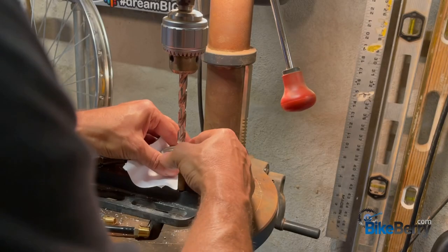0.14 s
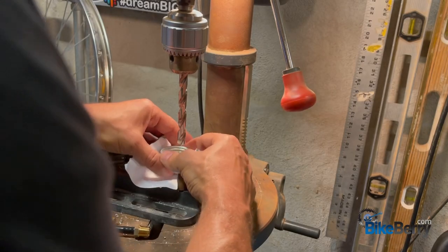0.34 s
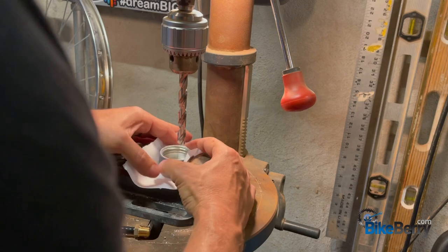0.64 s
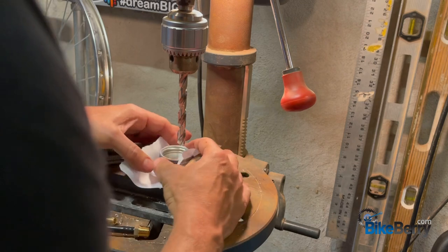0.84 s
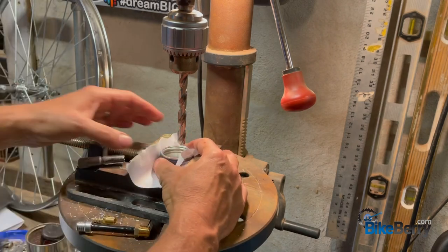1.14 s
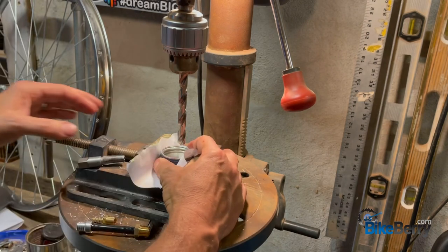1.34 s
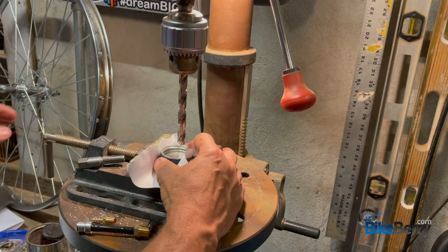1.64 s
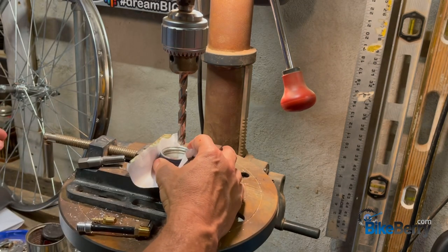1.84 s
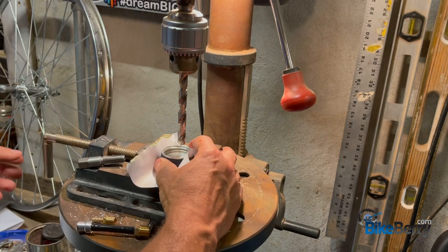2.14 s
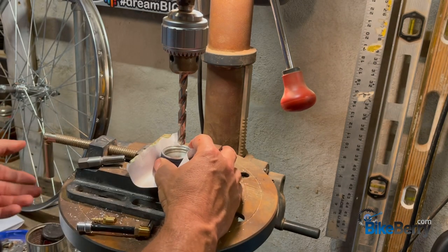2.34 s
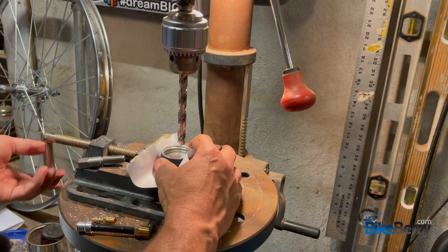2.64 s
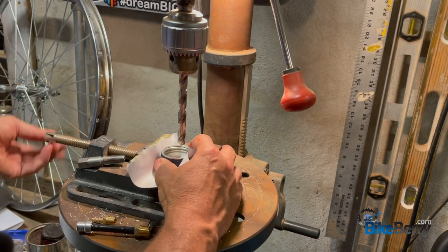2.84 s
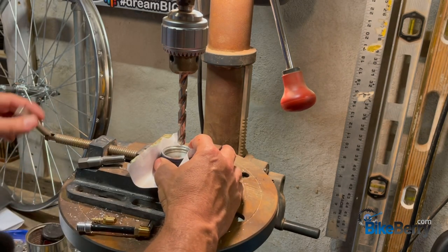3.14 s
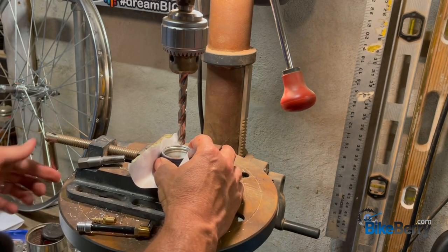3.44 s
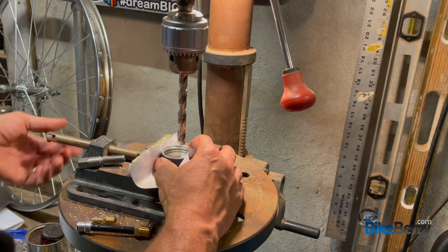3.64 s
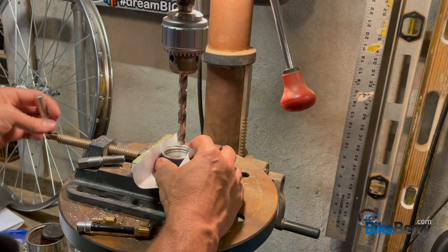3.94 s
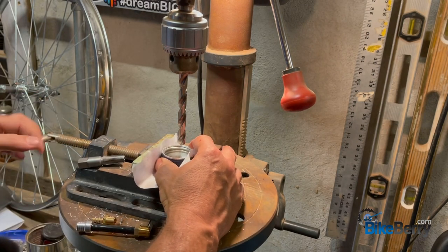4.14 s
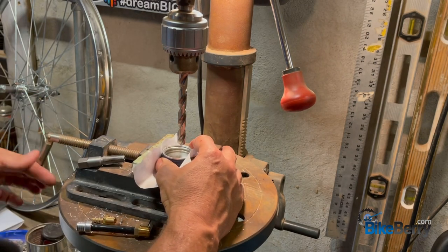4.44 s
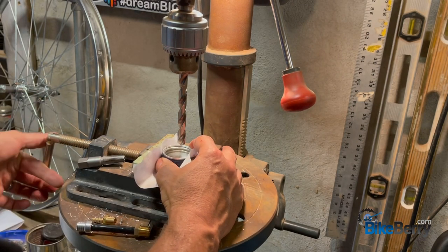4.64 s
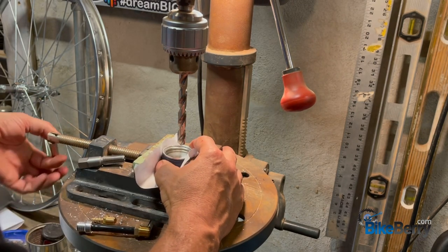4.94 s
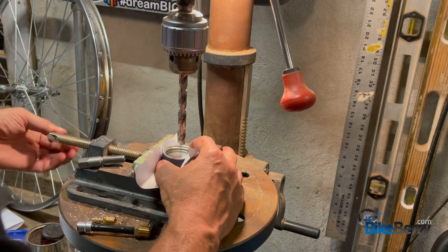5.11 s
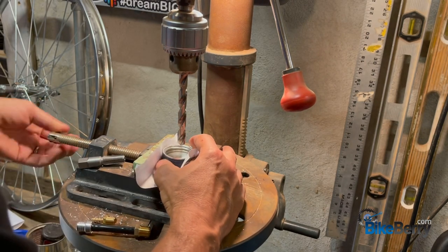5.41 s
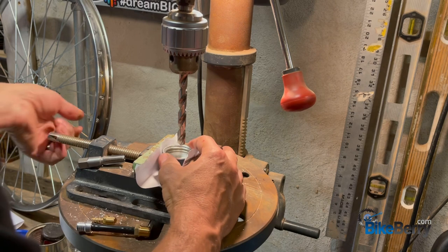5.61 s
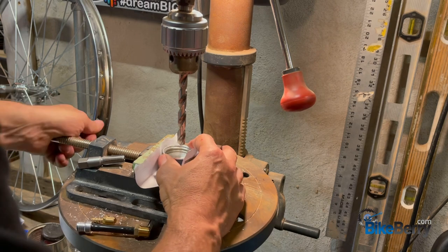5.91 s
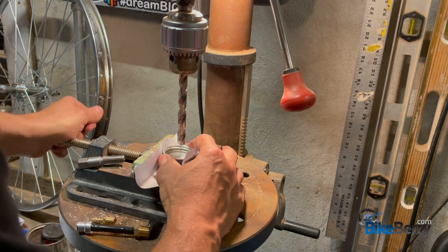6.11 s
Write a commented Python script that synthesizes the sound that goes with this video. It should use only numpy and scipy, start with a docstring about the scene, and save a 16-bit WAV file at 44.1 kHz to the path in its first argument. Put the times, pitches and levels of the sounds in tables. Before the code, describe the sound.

In a small, quiet workshop, heard up close, paper crinkles as a wrapped metal ring skids into a steel vise. Two sharp, briefly ringing clacks follow, then lighter clicks and scrapes. The vise screw is wound in with a soft rumble, dry grating, little squeaks and ticks from its sliding handle. The handle scrapes and knocks home, and a sleeve brushes past. Very faint cricket-like chirping lies behind.

```python
"""A small, quiet workshop, at an idle drill press. A paper-wrapped metal ring is settled in the vise:
paper crinkles, steel skids, clacks and rings, and the vise knocks on the cast table. The screw is
wound in by its sliding handle: it rumbles, its dry thread grates and squeaks, and the bar knocks
home as a sleeve brushes past. Faint high chirping, like distant crickets, lies behind it all."""
import sys
import numpy as np
from scipy import signal
from scipy.fft import rfft, irfft, next_fast_len
from scipy.io import wavfile
from scipy.ndimage import map_coordinates

SR = 44100
rng = np.random.default_rng(int(sys.argv[2]) if len(sys.argv) > 2 else 0)


def to_wav(s):
    """Save 16-bit WAV."""
    ch = np.atleast_2d(s).T  # columns
    pcm = np.round(np.clip(ch, -1, 1) * 32767)  # PCM
    wavfile.write(sys.argv[1], SR, pcm.astype(np.int16))


N = 276507

# resonances of vise and ring: f/Hz, width/Hz, level/dB
STEEL_MODES = [(590, 900, -8), (1250, 390, -1.5), (1990, 320, -0.5), (2640, 450, 1), (3320, 420, 0),
               (3880, 720, -3.5), (4765, 480, -2), (5060, 550, -3.5), (6650, 1500, -5), (8420, 1080, -4.5),
               (9990, 310, -3.5), (11300, 1600, -8.5), (15340, 7400, -9)]
# vise knocks on the table: t/s, level/dB, chatter/s, low cut/Hz, high cut/Hz
TABLE_KNOCKS = [(0.877, -48, 0.012, 60, 600), (1.395, -66, 0.0099, 120, 1000),
                (1.931, -61.5, 0.0046, 149.3, 998), (5.392, -51, 0.078, 380, 1800),
                (5.466, -42, 0.016, 240, 1310)]
SWELL_SHAPE = 1.9  # 2 is a bell, more is flatter


def amp(db):
    """Decibels to gain."""
    return 10 ** (np.asarray(db) / 20)


def unit(x):
    """Scale to rms 1."""
    return x / np.sqrt(np.mean(x ** 2) + 1e-20)


def along(points, hz):
    """Interpolate (f/Hz, value) points on a log axis."""
    f, value = np.transpose(points)
    return np.interp(np.log(hz + 1), np.log(f + 1), value)


def clock():
    """Sample times in s."""
    return np.arange(N) / SR


def stroke(start_s, length_s):
    """Gain that rises quickly, holds and lets go."""
    progress = np.clip((clock() - start_s) / length_s, 0, 3)
    return (1 - np.exp(-8 * progress)) * np.exp(-progress ** 6)


def swell(peak_s, half_s):
    """Gain that swells to 1 and fades."""
    return np.exp(-np.abs((clock() - peak_s) / half_s) ** SWELL_SHAPE)


def until(end_s, release_s):
    """Gain that holds at 1, then decays."""
    return np.exp(-np.maximum(clock() - end_s, 0) / release_s)


def together(gains):
    """Joint gain of unrelated noises."""
    return np.sqrt(sum(g ** 2 for g in gains))


def wobble(rate_hz):
    """Smooth random curve, rate_hz knots a second."""
    return map_coordinates(rng.standard_normal(N // 16), [clock() * rate_hz], mode="wrap")


def filtered(x, response):
    """Apply a complex frequency response."""
    n = x.shape[-1]
    size = next_fast_len(n + 8192)
    return irfft(rfft(x, size) * response(np.fft.rfftfreq(size, 1 / SR)), size)[..., :n]


def shaped(x, spectrum):
    """Apply an (f/Hz, gain/dB) curve."""
    return filtered(x, lambda f: amp(along(spectrum, f)))


def resonances(modes, f):
    """Causal response of (f/Hz, width/Hz, level/dB) modes of alternating sign."""
    return sum((-1) ** k * amp(db) * 1j * f * width / (hz * hz - f * f + 1j * f * width)
               for k, (hz, width, db) in enumerate(modes))


def spread(pair):
    """Mix two unrelated signals into partly alike left and right."""
    # stereo coherence: f/Hz, likeness/1
    likeness = [(60, 0.93), (300, 0.84), (700, 0.65), (1500, 0.52), (3000, 1), (6000, 1), (15000, 1)]
    angle = lambda f: np.arccos(np.clip(along(likeness, f), -1, 1)) / 2
    mid, side = filtered(pair, lambda f: np.array([np.cos(angle(f)), np.sin(angle(f))]))
    return np.array([mid + side, mid - side])


def friction(spectrum, grain_db):
    """Stereo noise of tiny uneven slips; rms 1."""
    slips = rng.standard_normal((2, N)) * amp(grain_db * wobble(1500))
    return unit(spread(shaped(slips, spectrum)))


def band(hz, width_hz):
    """Narrow noise with steep skirts; rms 1."""
    return unit(filtered(rng.standard_normal(N), lambda f: resonances([(hz, width_hz, 0)], f) ** 2))


def blow(chatter_s, response, grind):
    """An impulse and its dying micro-contacts through a body; rms 1 if packed into 4 ms."""
    t = np.arange(SR // 5) / SR
    force = rng.standard_normal(len(t)) * np.exp(-t / chatter_s)
    force *= grind * np.sqrt(chatter_s / 0.00071) / np.linalg.norm(force)
    force[0] = 1
    return unit(filtered(force, response)) * np.sqrt(0.004 * SR / len(t))


def add(track, start_s, sound):
    """Mix a sound in at start_s."""
    part = track[round(start_s * SR):][:len(sound)]
    part += sound[:len(part)]


def background():
    """Still room air and a low rumble; each table knock shakes the bench."""
    # resting rumble: t/s, level/dB
    rumble_levels = [(0, -83), (.7, -80.5), (1.6, -76.5), (2.65, -88), (3.7, -71.5), (4.4, -73.5),
                     (5.2, -73.5), (6.27, -74)]
    # rumble spectrum: f/Hz, level/dB
    rumble_spectrum = [(20, -15.5), (35, -19.5), (57, -0.5), (85, -5.5), (130, -4.5), (220, -13),
                       (400, -24), (1000, -66)]
    # air spectrum: f/Hz, level/dB
    air_spectrum = [(20, -14.5), (100, -2.5), (200, -6.5), (500, -5.5), (1200, -11), (2400, -12),
                    (4000, -14), (9000, -11), (16000, -28.5)]
    rest = amp(np.interp(clock(), *np.transpose(rumble_levels)))
    shakes = [amp(db - 24) * stroke(s, length_s=0.1) for s, db, *_ in TABLE_KNOCKS]
    rumble = together([rest] + shakes) * amp(1.2 * wobble(5.4)) * friction(rumble_spectrum, grain_db=4)
    return rumble + amp(-75.3) * friction(air_spectrum, grain_db=1.5)


def crickets():
    """One chirps regularly, one holds a thin note and stops, a far chorus trills."""
    # wing resonances: f/Hz, width/Hz, level/dB
    wing_bands = [(5176, 165, -0.5), (4850, 420, -5.5), (7730, 400, -17)]
    # chirp centres: t/s
    chirp_times = [1.915, 2.503, 3.095, 3.683, 4.24, 4.812]
    # chorus bands: f/Hz, width/Hz, level/dB
    trills = [(5580, 760, -76), (6730, 770, -81.5), (7400, 300, -79.5)]
    fade_db_per_s = 1
    wings = sum(amp(db) * band(hz, width_hz) for hz, width_hz, db in wing_bands)
    rough_wings = unit(wings * amp(wobble(160)))
    chirps = amp(-66.5) * rough_wings * sum(swell(s, half_s=0.097) for s in chirp_times)
    note = band(6880, width_hz=81) * amp(-74 - fade_db_per_s * clock()) * until(3.4, release_s=0.018)
    chorus = sum(amp(db) * band(hz, width_hz) for hz, width_hz, db in trills)
    return chirps + note + chorus


def paper():
    """The wrapping crinkles under rubbing fingers while held, more at each shift of the ring."""
    # shifts of the ring: peak t/s, half length/s, crinkle/dB, rub/dB
    shifts = [(0.083, 0.026, -56, -92), (0.309, 0.09, -48.5, -62), (0.489, 0.05, -56, -64),
              (0.551, 0.028, -55.5, -76), (0.784, 0.15, -54.5, -63.5), (0.905, 0.029, -41.5, -65),
              (0.966, 0.044, -50, -67.5)]
    # paper spectrum: f/Hz, level/dB
    paper_spectrum = [(60, -25), (300, -17.5), (1200, -14.5), (1900, -1.5), (3000, 0.5), (4000, 0),
                      (4900, 2), (6200, 2.5), (9000, 2.5), (16000, 2.5)]
    # fingers on the wrapped ring: f/Hz, width/Hz, level/dB
    rub_modes = [(296, 390, -1.5), (680, 270, 3.5), (1024, 140, 5.5), (1420, 260, 2), (2620, 360, -5)]
    hold_crinkle_db, hold_rub_db, buckles_per_s = -57, -79, 260
    hold = amp([[hold_crinkle_db], [hold_rub_db]]) * until(0.95, release_s=0.1)
    moves = [amp([[crinkle_db], [rub_db]]) * swell(s, half_s)
             for s, half_s, crinkle_db, rub_db in shifts]
    crinkle_gain, rub_gain = together([hold] + moves)
    grip = amp(1.5 * wobble(70))
    buckles = rng.random(N) < buckles_per_s / SR * amp(6 * wobble(35))  # tiny creases snap in clumps
    crackle = unit(shaped(buckles * rng.standard_normal(N), paper_spectrum))
    crinkle = friction(paper_spectrum, grain_db=1.5) + amp(-7) * crackle
    slips = friction([(100, 0.02), (5000, 0.0006)], grain_db=3)
    rub = unit(filtered(slips, lambda f: resonances(rub_modes, f)))
    return grip * (crinkle_gain * crinkle + rub_gain * rub)


def skids():
    """Ring and handle bar skid: bursts of uneven slips, each into one resonance."""
    # pitched rasps: peak t/s, half length/s, f/Hz, width/Hz, level/dB
    bursts = [(0.146, 0.017, 2750, 1500, -60), (0.27, 0.012, 4700, 450, -56),
              (0.315, 0.0063, 2300, 1800, -50), (0.337, 0.029, 5100, 1500, -49.5),
              (0.347, 0.044, 1160, 400, -63), (0.382, 0.0059, 2450, 800, -53),
              (0.74, 0.0065, 2870, 900, -55.5), (0.804, 0.015, 1320, 220, -62),
              (0.879, 0.0094, 884, 300, -55.5), (1.002, 0.0037, 3300, 1300, -51),
              (1.061, 0.0074, 1000, 900, -66), (2.807, 0.016, 1100, 710, -71),
              (3.162, 0.008, 1930, 260, -57), (4.433, 0.016, 3970, 496, -62.5),
              (4.593, 0.007, 3180, 1200, -63.5), (4.626, 0.031, 3000, 1600, -69.5),
              (4.687, 0.0072, 3700, 2040, -61.5), (5.393, 0.0048, 1890, 300, -57)]
    grain_db = 3.5
    out = np.zeros(N)
    t = np.arange(-SR // 10, SR // 10) / SR
    knots_s = t[::SR // 400]
    for s, half_s, hz, width_hz, db in bursts:
        slips = rng.standard_normal(len(t))
        slips *= amp(grain_db * np.interp(t, knots_s, rng.standard_normal(len(knots_s))))
        rasp = unit(filtered(slips, lambda f: resonances([(hz, width_hz, 0)], f) ** 2))
        envelope = np.exp(-np.abs(t / half_s) ** SWELL_SHAPE)
        out += np.interp(clock(), s + t, amp(db) * rasp * envelope, left=0, right=0)
    return out


def click(chatter_s, low_hz, main_hz, tilt_db_per_oct):
    """A blow on steel: weak below its lowest note, lifted at its main one, a thin ting on top."""
    # high ring of struck steel: f/Hz, width/Hz, level/dB
    ting = [(11400, 1600, -7.5)]
    highpass = signal.cheby1(5, 0.3, low_hz, "high", analog=True)

    def body(f):
        low_cut = signal.freqs(*highpass, f)[1] + 0.063
        main_note = 1 + resonances([(main_hz, 0.3 * main_hz, -3)], f)
        tilt = amp(tilt_db_per_oct * np.log2((f + 500) / 4000))
        return resonances(STEEL_MODES, f) * low_cut * main_note * (1 + resonances(ting, f)) * tilt
    return blow(chatter_s, body, grind=0.36)


def contacts():
    """Creases snap against the ring; ring, jaws and handle click together."""
    # steel contacts: t/s, level/dB, chatter/s, lowest f/Hz, main f/Hz, tilt/(dB/octave)
    hits = [(1.1136, -29.5, 0.0026, 3020, 9000, 11), (1.1143, -20, 0.0003, 1930, 4000, -1.5),
            (1.2705, -45, 0.00065, 3370, 4360, -4.5), (1.3222, -44, 0.0015, 1140, 5200, 1),
            (1.34, -38.5, 0.016, 1630, 2250, 3), (1.3934, -21, 0.0036, 1710, 2170, 1.1),
            (1.514, -43, 0.0055, 1240, 1840, 2.5), (1.623, -53.5, 0.008, 2850, 3400, -6),
            (1.788, -47, 0.0061, 555, 1890, -0.5), (1.931, -42, 0.0069, 680, 2930, 1),
            (2.483, -53.5, 0.0064, 1987, 5540, 4), (3.558, -55, 0.0066, 1780, 2300, -4.5),
            (3.945, -50.5, 0.0019, 2450, 3900, 1), (4.031, -49, 0.008, 3020, 4030, 5),
            (4.054, -50, 0.005, 2000, 2400, 2.5), (4.081, -47, 0.0063, 3000, 4000, 6.5),
            (4.109, -32.5, 0.00028, 3440, 4300, 6), (4.186, -41.5, 0.00055, 3380, 3930, 3),
            (4.417, -53, 0.0067, 2200, 3800, 3), (4.426, -44, 0.0063, 2130, 7950, 6.5),
            (4.504, -47.5, 0.014, 2200, 2430, 10), (4.9918, -53.5, 0.0065, 3220, 4260, 5),
            (5.007, -47, 0.0013, 2490, 3350, 8.5), (5.409, -47.5, 0.021, 2230, 3750, -3),
            (5.462, -40.5, 0.019, 714, 3720, -2.5), (5.566, -52.5, 0.0072, 1450, 3020, -6.5)]
    # large paper creases: t/s, level/dB
    snaps = [(0.639, -44.5), (0.7364, -45), (0.8034, -41.5), (0.869, -42.5), (0.898, -39.5), (0.983, -44)]
    out = np.zeros(N)
    for s, db, chatter_s, low_hz, main_hz, tilt_db_per_oct in hits:
        add(out, s, amp(db) * click(chatter_s, low_hz, main_hz, tilt_db_per_oct))
    for s, db in snaps:
        add(out, s, amp(db) * click(chatter_s=0.0041, low_hz=1977, main_hz=3600, tilt_db_per_oct=6))
    return out


def thuds():
    """The vise knocks on the cast table and rocks twice, each time softer and duller."""
    # cast table: f/Hz, width/Hz, level/dB
    table_modes = [(155, 90, -1.5), (262, 90, 3), (350, 90, 0), (535, 90, -2.5), (835, 110, -3.5),
                   (1050, 88, -7.5)]
    rock_s, rock_loss_db, rock_cutoff_ratio = 0.018, 6.5, 0.55
    out = np.zeros(N)
    for s, db, chatter_s, low_hz, high_hz in TABLE_KNOCKS:
        for k in range(3):
            cutoff_hz = high_hz * rock_cutoff_ratio ** k
            passband = lambda f: (1j * f / (low_hz + 1j * f)) ** 2 / (1 + 1j * f / cutoff_hz)
            knock = blow(chatter_s, lambda f: resonances(table_modes, f) * passband(f), grind=0.91)
            add(out, s + k * rock_s, amp(db - k * rock_loss_db) * knock)
    return out


def sing(modes):
    """Modes decay after a blow; nothing of them sounds below about 1.5 kHz."""
    scatter_db = 2
    t = np.arange(SR // 3) / SR
    hz, db, t60_s = np.transpose(modes)[:, :, None]
    decay = amp(db + scatter_db * rng.standard_normal(hz.shape) - 60 * t / t60_s)
    highpass = signal.butter(4, 1500, "high", fs=SR, output="sos")
    return signal.sosfilt(highpass, np.sum(decay * np.sin(2 * np.pi * hz * t), axis=0))


def clanks():
    """Ring and jaw sing on after two hard blows."""
    # blows: t/s, ring level/dB, jaw level/dB
    blows = [(1.1157, -43, -56), (1.394, -63, -44)]
    # metal ring: f/Hz, level/dB, t60/s
    ring_modes = [(1836, -6.5, 0.23), (1884, 11, .025), (2530, 2, 0.1395), (2475, 16.5, .015),
                  (3040, -3.5, .15), (3200, 2, .12), (3973, -7.5, .14), (4447, -1, .12), (4560, 6, .025),
                  (5114, -0.5, .12), (5502, -7, .18), (5825, -4, .18), (6170, -5, 0.18), (6740, -4, 0.17),
                  (7000, -1.5, 0.17), (7720, -6, .17), (8050, -4, .16), (10680, 15.5, 0.017)]
    # vise jaw: f/Hz, level/dB, t60/s
    jaw_modes = [(1820, -3, 0.086), (1910, -6.5, .13), (2200, -9, .14), (2300, 14, .014), (2450, -7, .12),
                 (3400, -3, 0.15), (4032, -8, .2), (4339, -10, .2), (4700, -9, .17), (4786, -7.5, .14),
                 (6500, -1, 0.15), (6940, 15, 0.022), (8400, -4, .14), (8760, 15, .01)]
    out = np.zeros(N)
    for s, ring_db, jaw_db in blows:
        add(out, s, amp(ring_db) * sing(ring_modes) + amp(jaw_db) * sing(jaw_modes))
    return out


def scrapes():
    """Sliding steel catches in many small slips and sets the handle bar rasping."""
    # steel on steel: t/s, length/s, level/dB, rasp share of power/1
    slides = [(1.31, 0.15, -51, 0.17), (1.502, 0.058, -53.5, 0.06), (1.566, 0.04, -49.5, 0.07),
              (1.599, 0.14, -66, 0.25), (1.948, 0.029, -54.5, 0.32), (3.608, 0.06, -68, 0.8),
              (4.041, 0.036, -57, 0.14), (5.218, 0.071, -56.5, 0.27), (5.261, 0.059, -49, 0.53),
              (5.347, 0.051, -54, 0.73)]
    # rasping handle bar: f/Hz, width/Hz, level/dB
    rasp_modes = [(2384, 430, 9), (2656, 310, 9.5), (3500, 660, 0.5), (5230, 1050, -0.5)]
    colour = lambda f: amp(along([(1000, -7.5), (3000, -9.0), (9000, 0.5)], f))
    slips = rng.standard_normal((2, N)) * amp(1.9 * wobble(900))
    steel = unit(filtered(slips[0], lambda f: resonances(STEEL_MODES, f) * colour(f)))
    bar = unit(filtered(slips[1], lambda f: resonances(rasp_modes, f)))
    out = np.zeros(N)
    for s, length_s, db, share in slides:
        out += amp(db) * stroke(s, length_s) * (np.sqrt(1 - share) * steel + np.sqrt(share) * bar)
    return out


def screw():
    """The screw drags the jaw along its bed in small slips; each push takes hold and slackens."""
    # pushes on the handle: t/s, level/dB
    pushes = [(2.785, -70), (3.12, -64.5), (3.57, -64.5), (4.261, -68), (4.95, -67), (5.53, -61.5)]
    # dragging jaw: f/Hz, level/dB
    drag_spectrum = [(25, -13), (90, -8), (150, -10), (250, -1.5), (500, -3), (900, -6), (1500, -12.5),
                     (2300, -13.5), (3500, -16.5), (8000, -16.5), (12000, -35)]
    rise_s, fade_s = 0.02, 0.64
    gains = []
    for s, db in pushes:
        age_s = np.maximum(clock() - s, 0)
        gains.append(amp(db) * (1 - np.exp(-age_s / rise_s)) * np.exp(-(age_s / fade_s) ** 2))
    return together(gains) * amp(0.85 * wobble(25)) * friction(drag_spectrum, grain_db=1)


def thread():
    """The dry thread grates as it turns; at times it sticks and slips at a rough, rising pitch."""
    # screw resonances: f/Hz, width/Hz, level/dB
    screw_modes = [(2200, 57, 2), (2297, 60, 0.5), (2550, 200, -5.5), (2910, 130, -6.5), (3170, 230, -9),
                   (4080, 290, -9.5), (7600, 450, -9), (9400, 240, -14)]
    # stick-slip squeaks: peak t/s, half length/s, f/Hz, level/dB
    squeaks = [(2.854, 0.044, 925, -76), (2.936, 0.025, 860, -65), (3.046, 0.034, 950, -73),
               (3.094, 0.022, 927, -62), (3.176, 0.03, 960, -55), (3.24, 0.032, 940, -69.5),
               (3.557, 0.023, 2160, -62.5)]
    # grating turns: peak t/s, half length/s, level/dB
    turns = [(2.94, 0.27, -76.5), (3.194, 0.12, -69.5), (3.516, 0.078, -69.5), (3.74, 0.2, -72),
             (4.054, 0.23, -71), (4.422, 0.038, -68), (4.516, 0.027, -66.5), (4.64, .06, -75),
             (5.003, 0.27, -75.5)]
    bend_ratio, flutter_ratio = 0.028, 0.0354
    flutter = flutter_ratio * wobble(450)
    catches = rng.standard_normal(N) * amp(4 * wobble(45))
    grate = unit(filtered(catches, lambda f: resonances(screw_modes, f)))
    squeaking = np.zeros(N)
    for s, half_s, hz, db in squeaks:
        push = np.clip((clock() - s) / half_s, -1, 1)
        phase = 2 * np.pi * np.cumsum(hz * (1 + bend_ratio * push + flutter)) / SR
        tone = np.sin(phase) + amp(-14) * np.sin(2 * phase)
        rasp = amp(-2) * band(hz, width_hz=250) + amp(-12) * grate
        squeaking += amp(db) * swell(s, half_s) * (tone + rasp)
    turning = together(amp(db) * swell(s, half_s) for s, half_s, db in turns)
    return squeaking * unit(amp(3 * wobble(400))) + turning * grate


def sleeve():
    """Cloth brushes past as the arm swings."""
    # arm swings: peak t/s, half length/s, level/dB
    swings = [(3.947, 0.13, -64), (4.55, 0.24, -69.5), (5.125, 0.18, -64.5), (5.796, 0.31, -53.5)]
    # sliding cloth: f/Hz, level/dB
    cloth_spectrum = [(500, -29), (2000, -37), (4000, -9), (5000, 9.5), (7000, 4), (9000, 8), (16000, 9)]
    arm = together(amp(db) * swell(s, half_s) for s, half_s, db in swings)
    return arm * amp(1.2 * wobble(31)) * friction(cloth_spectrum, grain_db=0.5)


def handle_knocks():
    """The handle bar rings against its stop as the screw tightens."""
    # hits on the stop: t/s, level/dB, chatter/s
    knocks = [(5.409, -42.5, .016), (5.452, -46, 0.0086), (5.463, -40.5, 0.021)]
    # struck bar: f/Hz, width/Hz, level/dB
    bar_modes = [(2004, 82, -5), (2290, 27, 10), (2600, 120, -15), (3640, 82, -12), (3830, 270, -4.5)]
    out = np.zeros(N)
    for s, db, chatter_s in knocks:
        add(out, s, amp(db) * blow(chatter_s, lambda f: resonances(bar_modes, f), grind=0.47))
    return out


def early_reflections(x):
    """Table, column and wall scatter the first milliseconds differently to each side."""
    t = np.arange(SR // 40) / SR
    scatter = rng.standard_normal((2, len(t))) * np.exp(-t / 0.0016) * (t > 0.001)
    scatter += 1.1 * scatter[::-1]  # cross-feed left and right
    return signal.fftconvolve(x[None], scatter / np.linalg.norm(scatter[0]), axes=1)[:, :N]


def reverb(x):
    """The walls answer with a short diffuse tail."""
    # room decay: f/Hz, t60/s
    decay_times = [(150, 0.32), (1000, 0.24), (2200, 0.26), (7000, 0.22), (12000, 0.13)]
    # tail colour: f/Hz, gain/dB
    tail_spectrum = [(100, 0), (1000, 1.5), (1900, -7.5), (2600, -6), (4500, -6.5), (7000, -2.5),
                     (9000, -2), (12000, -3)]
    hz, t, noise = signal.stft(rng.standard_normal((2, SR // 2)), SR, nperseg=256)
    decay = amp(-60 * t / along(decay_times, hz)[:, None])
    tail = signal.istft(noise * decay, SR, nperseg=256)[1]
    tail = spread(shaped(tail, tail_spectrum))
    tail = np.pad(tail / np.linalg.norm(tail[0]), ((0, 0), (SR // 300, 0)))  # 3.3 ms pre-delay
    return signal.fftconvolve(x[None], tail, axes=1)[:, :N]


def scene():
    """Close work at the vise over the quiet of the room."""
    clicks = contacts()
    rubs = thuds() + scrapes() + skids() + thread()
    rings = clanks() + handle_knocks()
    close = clicks * amp([[0.49], [-0.49]]) + amp(-7.5) * early_reflections(clicks) + rubs + rings
    room = reverb(amp(-7.5) * clicks + amp(-4.5) * rubs + amp(-10.5) * rings)
    return close + room + screw() + paper() + sleeve() + crickets() + background()


def record(dry):
    """Two microphone ports colour the treble, turn its phase and limit the band."""
    # microphone response: f/Hz, gain/dB
    mic_curve = [(20, 1.5), (8000, -0.5), (9500, 5.5), (10800, 7), (11700, -5.5), (12500, -15.5),
                 (13500, -29.5), (15200, -32.5), (16000, -28)]
    # balance: f/Hz, left minus right/dB
    balance = [(100, -0.5), (500, 1.5), (1600, 3), (2600, 1.5), (4000, 1), (6000, 0.5), (10000, 0)]
    # port phase: f/Hz, left lead/rad
    phase_lead = [(20, 0), (2000, 0), (3200, .65), (5500, .2), (8750, 0), (11700, -6.2), (12700, -6.5),
                  (15000, -12.5)]
    top_hz, taper_hz = 16700, 600

    def response(f):
        sides = amp(np.array([[0.5], [-0.5]]) * along(balance, f))
        right_lag = np.exp(1j * np.array([[0], [-1]]) * along(phase_lead, f))
        band_limit = np.clip((top_hz - f) / taper_hz, 0, 1)
        return amp(along(mic_curve, f)) * sides * right_lag * band_limit
    return filtered(dry, response)


dry = scene()
out = record(dry)
to_wav(out)
```